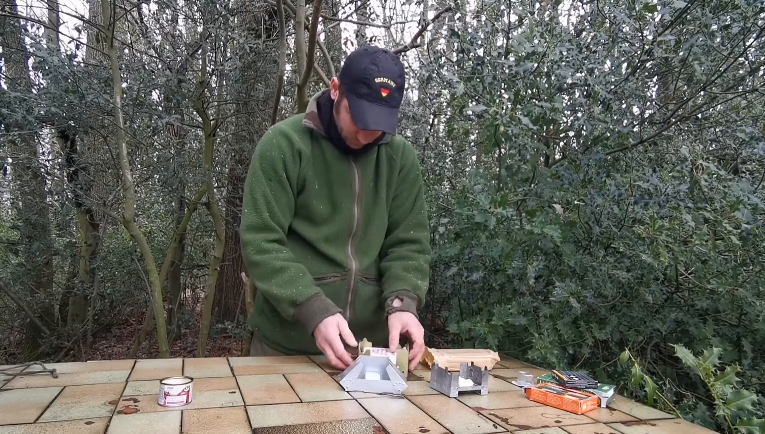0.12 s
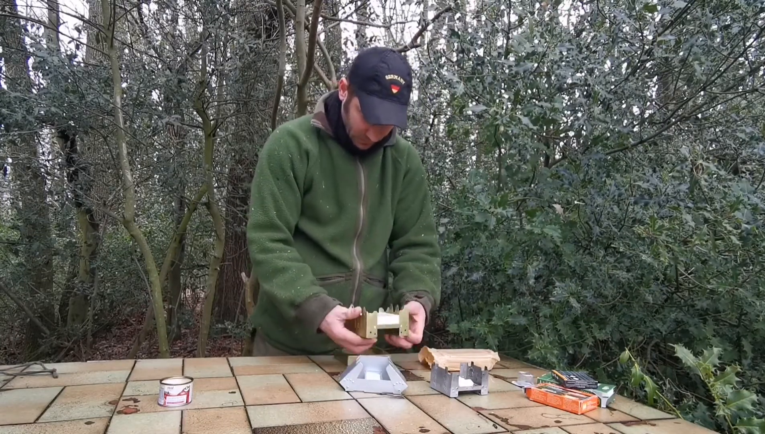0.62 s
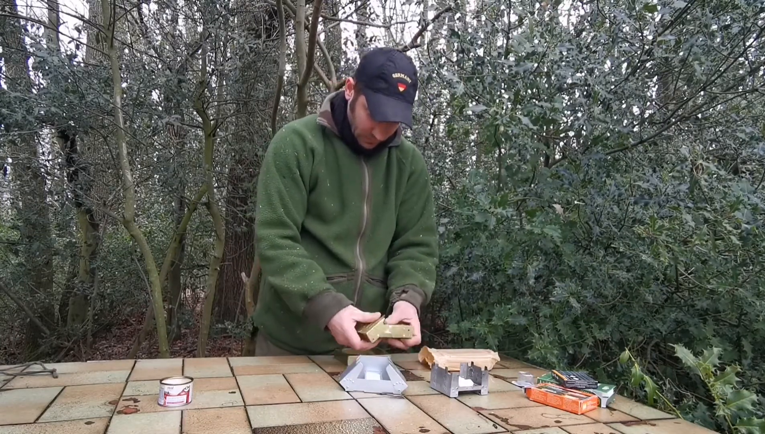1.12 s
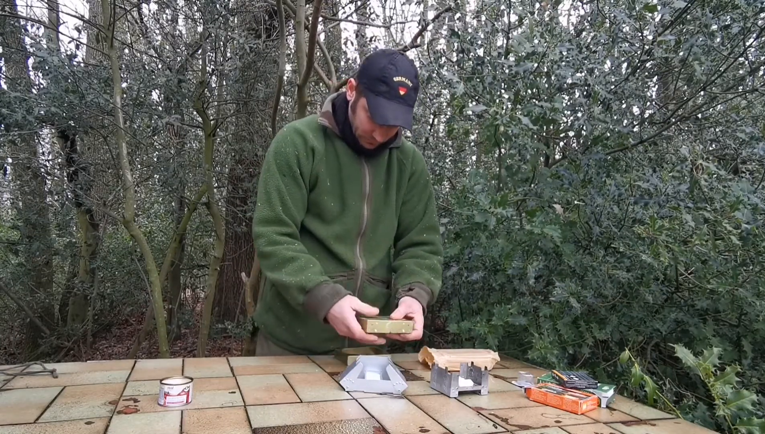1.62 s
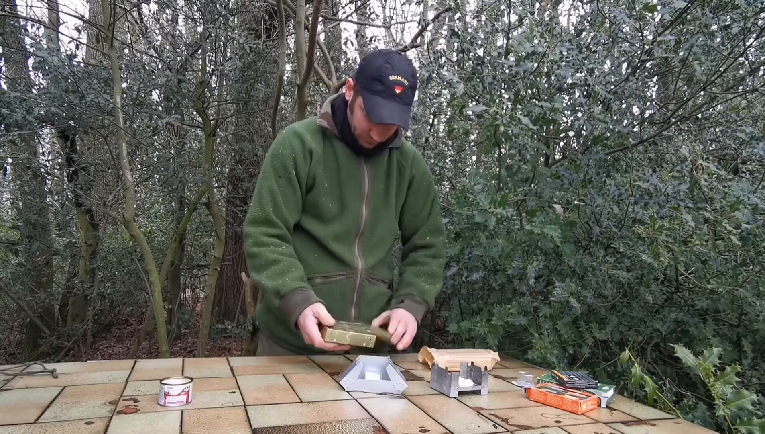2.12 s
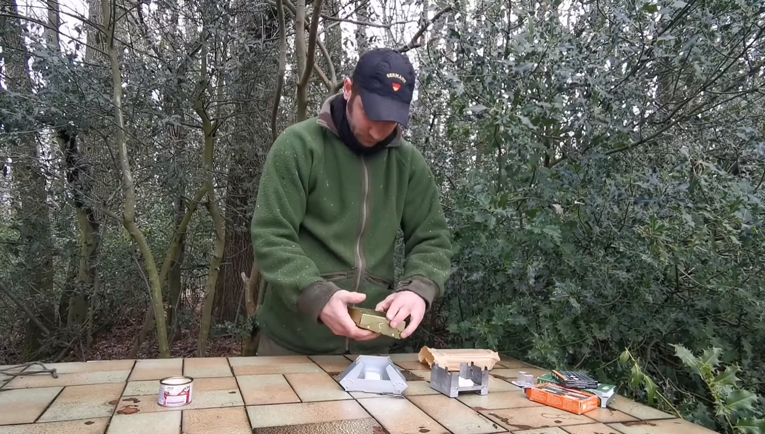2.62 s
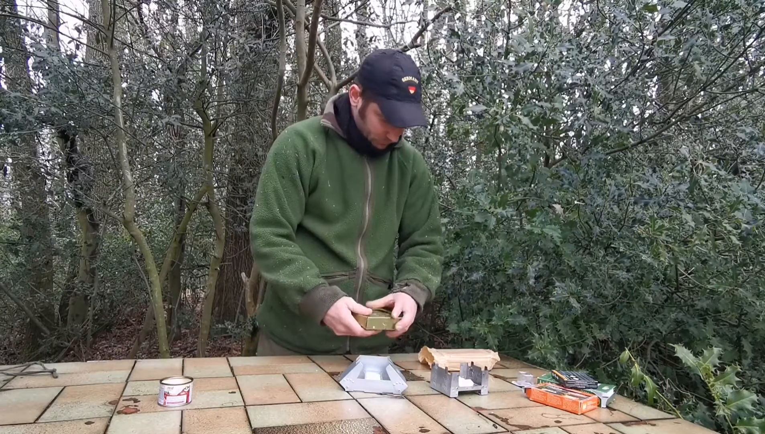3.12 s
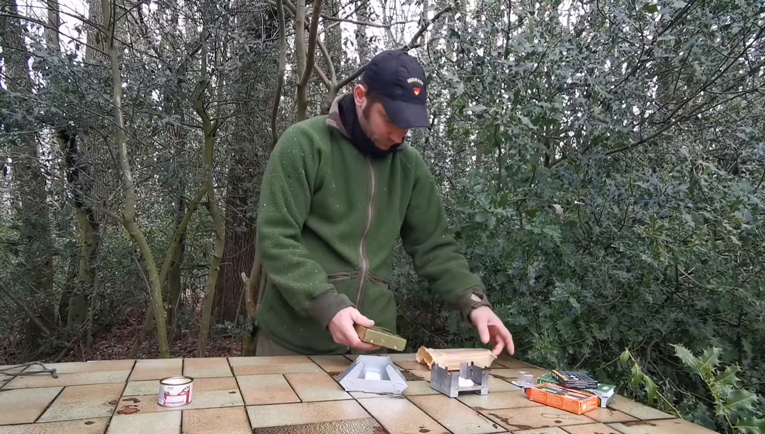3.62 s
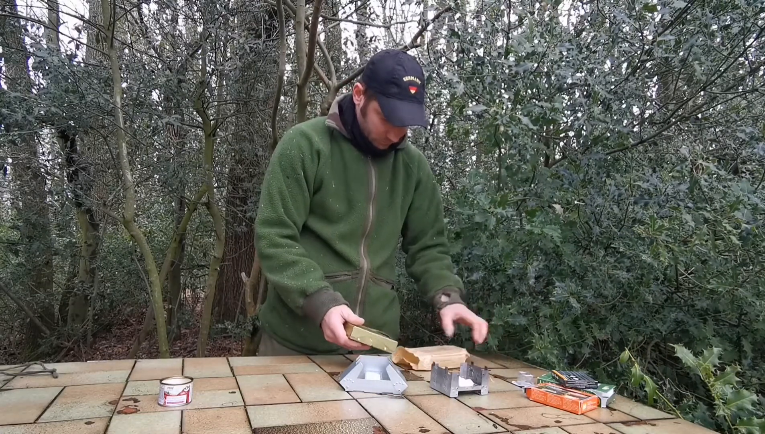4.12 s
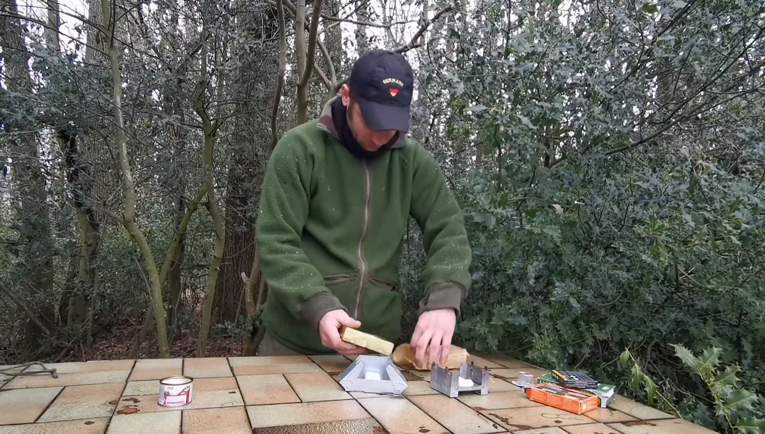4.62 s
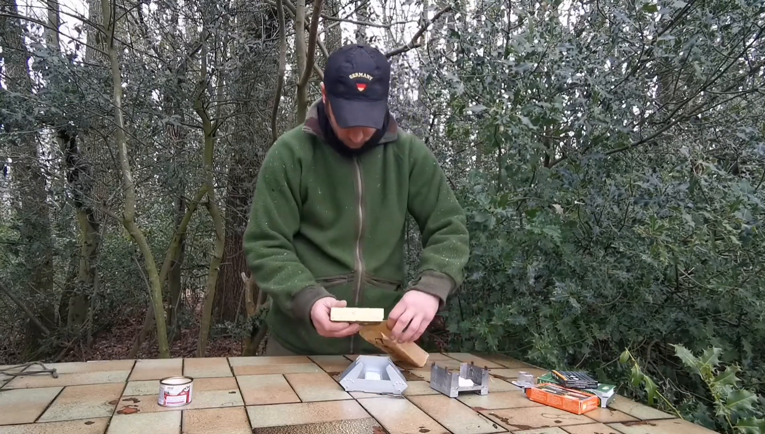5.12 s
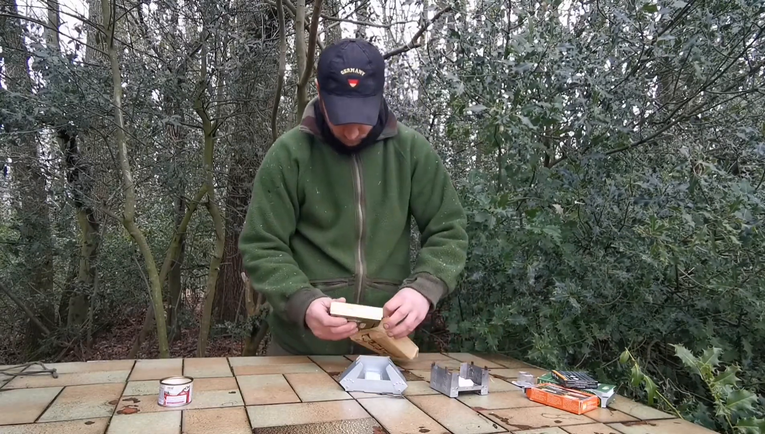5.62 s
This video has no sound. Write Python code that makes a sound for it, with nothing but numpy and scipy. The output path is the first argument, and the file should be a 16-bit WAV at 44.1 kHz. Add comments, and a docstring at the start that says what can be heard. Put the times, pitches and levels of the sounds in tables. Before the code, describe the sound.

Sharp bright metallic clacks and scrapes from handled folding metal, dense then sparse, while woodland birds whistle and chip over soft low rumble.

```python
"""Sharp clicks, knocks and rubbing: hands fold and open small sheet-metal stoves over a tiled table in a wood.
Blows start decaying modes of the sheet; slides are noise broken into grains. Birds whistle, slur, chip and rasp
as gliding sines and partial stacks; far songs and the rasper's fading last calls are narrow moving noise. One
far engine drone near 78 Hz lies over a wandering low rumble at 46-67 Hz, both wavering sines. Air and far
traffic are shaped noise."""
import sys
import numpy as np
from scipy import signal
from scipy.fft import rfft, irfft
from scipy.io import wavfile

SR = 44100
rng = np.random.default_rng(int(sys.argv[2]) if len(sys.argv) > 2 else 0)


def persist_wave(psi):
    """Save psi, clipped to +-1, as 16-bit WAV."""
    counts = np.round(np.clip(psi, -1, 1) * 32767).astype(np.int16)
    wavfile.write(sys.argv[1], SR, np.atleast_2d(counts).T)


def voltage_ratio(level):
    """Linear amplitude factor for a level in decibels (scalar or array-like)."""
    return 10 ** (np.asarray(level, float) / 20)


N = 254016


def in_time(rows):
    """Table columns interpolated at every sample."""
    s, *columns = np.transpose(rows)
    return [np.interp(np.arange(N) / SR, s, c) for c in columns]


def at_hz(points, hz):
    """A spectrum read on a log-frequency axis."""
    points_hz, values = np.transpose(points)
    return np.interp(np.log(hz), np.log(points_hz), values)


def rms_one(x):
    """Scaled to unit rms."""
    return x / np.sqrt(np.mean(x ** 2) + 1e-20)


def drift(rate_hz):
    """Slow chance of spread 1: noise through two equal poles, drawn every 40 samples."""
    pole = np.exp(-2 * np.pi * rate_hz * 40 / SR)
    noise = rng.standard_normal(N // 40 + 2002)
    slow = signal.lfilter([1], [1, -2 * pole, pole * pole], noise)[2000:]   # settled part
    return np.interp(np.arange(N) / 40, np.arange(len(slow)), rms_one(slow))


# left-right likeness: (frequency [Hz], likeness [-1..1])
LIKENESS = [(60, 0.88), (180, 0.71), (550, 0.55), (1650, 0.22), (5000, -0.21), (15000, -0.095)]


def coloured(white, spectrum):
    """Mid and side noise shaped by a spectrum and mixed to left and right by likeness; rms 1."""
    hz = np.maximum(np.fft.rfftfreq(N, 1 / SR), 10)
    alike = np.clip(at_hz(LIKENESS, hz), -1, 1)
    mid, side = rfft(white) * voltage_ratio(at_hz(spectrum, hz))
    mid, side = np.sqrt(1 + alike) * mid, np.sqrt(1 - alike) * side
    return rms_one(irfft(mid + side * [[1], [-1]], N))


def trees(x, t60_s):
    """Trunks scatter the sound back as a short dull tail, different on each side."""
    t = np.arange(SR // 2) / SR
    tail = rng.standard_normal((2, len(t))) * voltage_ratio(-60 * t / t60_s) * (t > .006)
    tail = signal.lfilter([.5], [1, -.5], tail)
    tail = tail / np.sqrt(np.sum(tail ** 2) / 2)
    return signal.fftconvolve(x, tail, axes=1)[:, :N]


def sung(notes, wobble_db):
    """Near sines that follow pitch and rms level, silent between notes."""
    out, wobble = np.zeros(N), voltage_ratio(wobble_db * drift(135))
    for rows in notes:
        s, hz, level_db = np.transpose(rows)
        at = np.arange(round(s[0] * SR), min(round(s[-1] * SR), N))
        level = np.sqrt(2) * voltage_ratio(np.interp(at / SR, s, level_db)) * signal.windows.tukey(len(at), .25)
        phase = 2 * np.pi * np.cumsum(np.interp(at / SR, s, hz)) / SR
        out[at] += level * np.sin(phase)
    return out * wobble


def glides(notes, wobble_db, edge_db=6):
    """Straight sweeps from a first to a last pitch, loudest in the middle."""
    curves = []
    for s, long_s, first_hz, last_hz, db in notes:
        curves.append([(s, first_hz, db - edge_db),
                       (s + .5 * long_s, .5 * (first_hz + last_hz), db),
                       (s + long_s, last_hz, db - edge_db)])
    return sung(curves, wobble_db)


# spectrum shape of air and far traffic: (frequency [Hz], relative density [dB per Hz])
WOOD = [(12, -27), (20, 3.5), (70, -2.5), (123, -8.5), (168, -10), (347, -20.5), (660, -21), (1660, -27),
        (2750, -19.5), (3840, -28), (6720, -27), (8180, -37), (13200, -35.5), (14700, -37.5),
        (16000, -42.5)]


def air(level_db=-58, patchy_db=2.5):
    """Leaves, far birds and traffic as shaped noise: each octave swells and sinks largely on its own."""
    noise = rfft(coloured(rng.standard_normal((2, N)), WOOD))
    octave = np.log2(np.maximum(np.fft.rfftfreq(N, 1 / SR), 125) / 125)
    together, out = drift(0.38), 0
    for k in range(9):
        band = irfft(noise * np.maximum(1 - np.abs(octave - k), 0), N)
        out = out + band * voltage_ratio(patchy_db * (0.2 * together + 1.08 * drift(4.7)))
    return voltage_ratio(level_db) * out


def wavering_sine(curve, waver_db):
    """One low sine along a pitch and level curve, both drifting by chance."""
    hz, level_db = in_time(curve)
    phase = 2 * np.pi * np.cumsum(hz + 3.39 * drift(5.44)) / SR
    return np.sqrt(2) * voltage_ratio(level_db + waver_db * drift(6.7)) * np.sin(phase)


# wandering low rumble before wavering: (time [s], pitch [Hz], level [dB])
LOW_RUMBLE = [(0, 46.53, -56), (1.64, 57.45, -59), (1.94, 59.7, -82), (3.98, 62.94, -56.5),
              (4.14, 67.07, -54.5), (4.94, 66.86, -69), (5.04, 63.6, -53.5), (5.76, 65.66, -55.5)]


def low_rumble():
    """A wandering low rumble at 46-67 Hz: one wavering sine."""
    return wavering_sine(LOW_RUMBLE, waver_db=1.0)


# far engine drone before wavering: (time [s], pitch [Hz], level [dB])
ENGINE_DRONE = [(0.0, 77.63, -47.5), (0.93, 81.1, -49), (1.27, 81.4, -57), (1.43, 74.4, -71),
                (1.94, 75.75, -70.5), (2.21, 80.0, -64), (2.73, 79.9, -64), (2.82, 76, -71),
                (3.13, 78.4, -55), (3.42, 80.2, -74), (3.88, 76.3, -56.5), (4.11, 78.6, -48),
                (4.62, 80.1, -54.5), (5.63, 80.2, -43.5), (5.76, 77.3, -40.5)]


def engine_drone():
    """One far engine order near 78 Hz, wavering on its way through the air."""
    return wavering_sine(ENGINE_DRONE, waver_db=1.5)


# far songs blurred by the trees, and from 4.8 s the rasping bird's fading last calls as narrow noise: (start
# [s], length [s], first pitch [Hz], last pitch [Hz], level [dB])
BLURRED_SONGS = [(1.75, 0.28, 6690, 6300, -63), (2.087, 0.47, 4880, 4960, -64.5),
                 (3.381, 0.11, 4420, 4300, -58.5), (3.479, .24, 4150, 4140, -64.5),
                 (3.778, 0.208, 3920, 4000, -61.5), (3.974, 0.051, 3880, 4070, -56),
                 (4.817, .05, 4800, 5430, -58.5), (4.897, 0.092, 5200, 5930, -61.5),
                 (5.039, 0.079, 5200, 5900, -66.5), (5.144, 0.095, 3380, 3330, -74)]


def blurred_songs(width_hz=450):
    """Narrow noise carried on each moving centre, unrelated left and right."""
    lowpass = signal.butter(2, width_hz, fs=SR, output="sos")
    in_phase, quadrature = rms_one(signal.sosfilt(lowpass, rng.standard_normal((2, 2, N))))
    out = np.zeros((2, N))
    for s, long_s, first_hz, last_hz, level_db in BLURRED_SONGS:
        at = np.arange(round(s * SR), round((s + long_s) * SR))
        turn = 2 * np.pi * np.cumsum(np.linspace(first_hz, last_hz, len(at))) / SR
        carried = in_phase[:, at] * np.cos(turn) + quadrature[:, at] * np.sin(turn)
        out[:, at] += voltage_ratio(level_db) * signal.windows.tukey(len(at), .3) * carried
    return out


# thin high notes far off: (start [s], length [s], first pitch [Hz], mid-note level [dB])
THIN_NOTES = [(1.34, 0.1, 7520, -64), (1.559, 0.17, 7530, -69), (5.54, 0.19, 7640, -72)]


def thin_notes(sag_hz=162):
    """Thin high sines that sag a little and waver strongly in level."""
    return glides([(s, long_s, hz, hz - sag_hz, db) for s, long_s, hz, db in THIN_NOTES], wobble_db=6.5)


# slurred notes: (start [s], length [s], first pitch [Hz], last pitch [Hz], mid-note level [dB])
SLURS = [(2.25, 0.043, 2800, 2220, -60), (3.885, .022, 3340, 2630, -58), (4.212, .03, 3422, 2600, -59),
         (4.345, .028, 3400, 2530, -64), (4.857, 0.016, 2074, 3083, -58), (4.868, .016, 2000, 1734, -60),
         (4.902, 0.0144, 1980, 3280, -52.5), (4.918, 0.035, 3530, 3700, -60),
         (5.072, .042, 2220, 1780, -62), (5.115, 0.02, 2000, 3450, -51)]


def slurs():
    """Brief sines sweeping straight up or down."""
    return glides(SLURS, wobble_db=2.5)


# falling chips, all alike: (start [s], mid-note level [dB])
CHIPS = [(0.054, -63.5), (.18, -70), (.77, -68), (0.811, -64.5), (1.362, -69), (1.797, -66.5),
         (2.003, -59.5), (2.115, -61.5), (2.465, -66), (3.015, -58), (3.073, -61.5), (3.134, -63.5),
         (3.189, -56), (3.253, -60), (3.318, -62), (3.397, -63), (4.088, -58)]
CHIP_S, CHIP_TOP_HZ, CHIP_END_HZ = 0.0248, 3700, 2900
TICKS_FROM_S, TICK_EVERY_S, TICK_S, TICK_DB = 4.955, .0647, .016, -61
TICK_TOP_HZ, TICK_END_HZ = 3600, 2480


def chips():
    """Short downward sweeps: scattered chips and one even run of eight steeper ticks."""
    scattered = [(s, CHIP_S, CHIP_TOP_HZ, CHIP_END_HZ, db) for s, db in CHIPS]
    ticks = [(TICKS_FROM_S + k * TICK_EVERY_S, TICK_S, TICK_TOP_HZ, TICK_END_HZ, TICK_DB) for k in range(8)]
    return glides(scattered + ticks, wobble_db=0.0)


# rasping calls: (start [s], final pitch [Hz], level before swell and flutter [dB])
RASPS = [(4.065, 502.7, -57), (4.19, 513.7, -55), (4.309, 530, -57.5), (4.435, 538.3, -56),
         (4.56, 512, -57), (4.685, 478, -58.5)]
# throat resonances: (centre [Hz], width [Hz], gain [dB])
RASP_THROAT = [(4250, 750, -1), (5100, 700, 0), (6000, 700, -13), (6750, 600, -8)]
RASP_S, RASP_RISE = .08, .065   # length; share by which the pitch climbs


def rasps():
    """A low pitch whose upper partials pass the throat resonances: a stack of close lines rising, then level."""
    out, order = np.zeros(N), np.arange(7, 15)[:, None]
    flutter = voltage_ratio(2 * drift(120))
    hoarse = signal.lfilter([.02], [1, -.98], rng.standard_normal((len(order), N)))
    for s, end_hz, level_db in RASPS:
        part = np.linspace(0, 1, round(RASP_S * SR))
        swing = .04 * np.exp(-12 * part)   # quick upswing at the start
        hz = end_hz * (1 - RASP_RISE * (1 - part) ** 2 - swing)
        throat = sum(voltage_ratio(db) / (1 + (2 * (order * hz - centre_hz) / width_hz) ** 6)
                     for centre_hz, width_hz, db in RASP_THROAT)
        at = round(s * SR)
        throat = throat * (1 + 9 * hoarse[:, at:at + len(part)])   # each partial roughened on its own
        phase = order * 2 * np.pi * np.cumsum(hz) / SR + order ** 2
        voiced = rms_one(np.sum(throat * np.sin(phase), axis=0))
        out[at:at + len(part)] += voltage_ratio(level_db) * np.sqrt(2) * voiced * np.sin(np.pi * part) ** 0.58
    return out * flutter


# clear whistles: (start [s], length [s], top pitch before scoop and bend [Hz], last pitch [Hz], peak level [dB])
WHISTLES = [(3.4, .073, 2990, 2870, -45), (3.505, .085, 3190, 2380, -49), (3.968, .088, 3150, 2800, -45),
            (4.09, .082, 3160, 2380, -46), (.915, .05, 2800, 2550, -61), (.96, .06, 3000, 2750, -64),
            (1.555, .07, 2900, 2750, -65), (1.71, .07, 2950, 2800, -63), (2.36, .11, 2930, 2800, -60),
            (2.84, .09, 2970, 2760, -65)]
SCOOP_HZ, SCOOP_SHARE, BEND_POWER = 330, .25, 3.0
WHISTLE_SWELL_DB, WHISTLE_DROP_DB, LOUDEST_SHARE = 18, 9, .65


def whistles():
    """Sines scoop up and bend down at the end; the level swells to its loudest moment and drops."""
    part = np.linspace(0, 1, 12)
    rising = part < LOUDEST_SHARE
    depth_db = np.where(rising, WHISTLE_SWELL_DB, WHISTLE_DROP_DB)
    span = np.where(rising, LOUDEST_SHARE, 1 - LOUDEST_SHARE)
    swell_db = -depth_db * ((part - LOUDEST_SHARE) / span) ** 2
    scoop_hz = SCOOP_HZ * np.exp(-part / SCOOP_SHARE)
    notes = []
    for s, long_s, top_hz, last_hz, db in WHISTLES:
        hz = top_hz - scoop_hz - (top_hz - last_hz) * part ** BEND_POWER
        notes.append(np.c_[s + long_s * part, hz, db + swell_db])
    return sung(notes, wobble_db=1.0)


# sliding on the sheet: (loudest moment [s], swell [ms], pressure [dB], finger over edge [dB])
SLIDES = [(0, 5, -62.5, 23), (.125, 19, -61, -7), (0.342, 3.7, -53.5, 2), (.44, 72, -57.5, 4),
          (.495, 12, -55.5, -1), (0.762, 37, -59, 3), (.885, 21, -56.5, 3), (1.072, 15.7, -39, -1.5),
          (1.149, 40, -48.5, 5), (1.2, 6.3, -71, -20), (1.238, 11, -43, -8), (1.39, 42, -70, -14),
          (1.463, 18, -62.5, 25), (1.645, 11, -58, -8), (1.879, 21, -51, -2), (1.92, 13, -60, 17),
          (2.07, 29, -58.5, -0.5), (2.218, 6.5, -48.5, -21), (2.332, 3.3, -44.5, -36),
          (2.629, 16, -40.5, -12), (2.68, 9.1, -36, -15), (2.783, 18, -48, 2.5), (2.967, 5.2, -35.5, -7.5),
          (2.995, 5, -54, 0), (3.25, 6.6, -56, -21), (3.729, 4.7, -52, -7.5), (3.93, 97, -56.5, -4.5),
          (4.5, 66, -72.5, -33), (4.63, 18, -85, -7), (4.762, 150, -57, 0), (5.28, 31, -56.5, 7),
          (5.491, 70, -56, -1.5), (5.74, 45, -54, 1.5)]
# spectrum shapes of edges and of fingers: (frequency [Hz], relative density [dB per Hz])
BRIGHT_RUB = [(2000, -33), (3500, 4), (6000, 5), (8000, 0), (11000, 0), (15500, -23)]
DULL_RUB = [(250, -14), (600, -0.5), (1200, 0), (2000, 4.5), (3500, -4), (6000, -14.5)]
FADE_MS, FADE_PER_SWELL = 15.5, 0.55   # a slide dies away slower the slower it swelled


def rubbing():
    """Sliding contact: noise broken into uneven grains, bright on edges and dull under fingers."""
    ms, bright, dull = np.arange(0, N, 20) / SR * 1000, 0, 0
    for s, swell_ms, pressure_db, finger_db in SLIDES:
        since_ms = ms - s * 1000
        fade_ms = FADE_MS + FADE_PER_SWELL * swell_ms
        rise_fall = np.where(since_ms < 0, since_ms / max(swell_ms, 1), -since_ms / fade_ms)
        pressure = voltage_ratio(pressure_db) * np.exp(rise_fall)
        bright = bright + voltage_ratio(-.5 * finger_db) * pressure
        dull = dull + voltage_ratio(.5 * finger_db) * pressure
    bright, dull = (np.interp(np.arange(N) / SR * 1000, ms, level) for level in (bright, dull))
    grains = rng.standard_normal((2, 2, N)) * voltage_ratio(2.04 * drift(187) + 2.0 * drift(48))
    return bright * coloured(grains[0], BRIGHT_RUB) + dull * coloured(grains[1], DULL_RUB)


# metal meets metal or tile:
# (time [s], peak of the whole blow [dB], favoured ring [Hz], contact [ms], strength of far lows and highs [dB])
BLOWS = [(0.1139, -45.5, 2870, 10.6, 0.5), (0.244, -44, 2890, 3.9, -21), (.3267, -41.5, 1310, 9, -4),
         (0.3407, -35, 1220, 3.3, -8), (0.3635, -35, 2800, 5.4, -13), (0.4035, -27.5, 1450, 5.1, -20),
         (0.425, -37, 2800, 1.84, -17), (.46, -26, 2970, 2.96, -33.5), (0.487, -42.5, 5380, 8.7, 19),
         (0.681, -54, 6000, 4.9, 12), (.745, -46, 1940, 3.65, -13), (.8758, -40, 2050, 8.4, -2),
         (0.936, -45.5, 7000, 2, -17), (1.0438, -44, 6760, 8.6, -7), (1.054, -45, 2630, 9.7, -23),
         (1.072, -17.5, 5800, 1.6, -6.5), (1.078, -20.5, 6200, 2.4, -3), (1.1348, -34.5, 5210, 7.6, 5),
         (1.1568, -26, 5650, 1.7, 4), (1.19, -41, 1620, 49, -17), (1.24, -19.5, 1580, 1.37, 2),
         (1.2408, -22.5, 1080, 6.6, -1.5), (1.2532, -24, 2000, 4.5, -4), (1.3364, -44, 7100, 2.7, -6),
         (1.3867, -44.5, 1930, 6, -5), (1.398, -48, 7320, 2.3, -4), (1.4455, -40, 6800, 11.5, -5),
         (1.4606, -28, 2230, 3.1, 10), (1.4651, -19.5, 1950, 4.78, -9), (1.4831, -45, 2130, 8.8, -26),
         (1.6421, -31.5, 6300, 2.9, -3.5), (1.702, -44, 6700, 3.1, -11), (1.8563, -35.5, 6950, 2.9, -9),
         (1.8754, -37, 1600, 2.8, -18), (1.8847, -37, 1640, 3, -6), (1.904, -29, 6500, 1.38, -10),
         (1.9383, -37.5, 1920, 3, -8), (2.0664, -45.5, 5300, 3.3, -4), (2.2021, -33, 2560, 14, -16),
         (2.2156, -28.5, 3440, 10.2, -16), (2.2222, -33, 2740, 7.5, -29), (2.324, -23, 10900, 2.9, -1),
         (2.3283, -21, 6500, 11.2, -8.5), (2.416, -43, 6100, 7.1, 8), (2.5798, -12, 6880, 8.1, -3.5),
         (2.6006, -14, 5810, 6.8, -3.5), (2.6105, -16, 3700, 7.1, -3), (2.6258, -17, 6930, 9.4, -3),
         (2.634, -25, 3480, 7.3, -22), (2.657, -29, 6850, 13, -12.5), (2.682, -14, 4700, 3.68, -9),
         (2.684, -13.5, 11300, 8.9, -13), (2.7868, -30, 4770, 10.1, -7.5), (2.929, -48, 6100, 8.5, -8),
         (2.9672, -16.5, 6560, 4.25, 1.5), (2.99, -19.5, 6000, 2.9, 0), (3.134, -46, 3555, 2.7, -6),
         (3.243, -31, 5030, 3.22, 5.5), (3.7248, -39.5, 10200, 9, -10.5), (4.623, -43, 4480, 8.4, -8),
         (4.6743, -52, 5100, 13, 8), (5.2343, -45, 2665, 3.4, -5.5), (5.2654, -41.5, 2630, 7.04, -6),
         (5.4784, -36.5, 417, 4.1, 8), (5.5036, -42.5, 1554, 7.2, 8), (5.7077, -48, 710, 10.5, -2),
         (5.7326, -33, 1180, 1.5, 11)]
# modes of the folded sheet: (frequency [Hz], relative level [dB], free t60 [s])
SHEET = [(1502, 4, 0.058), (2230, -3, 0.68), (3480, -8, 0.3), (3880, -29, 0.031), (4706, -4, 0.3),
         (5233, 4.5, 0.46), (6000, 1, 0.31), (6600, -13.5, 0.23), (6232, 2, 0.15), (6930, 9.5, 0.3),
         (8260, -4, 0.1), (8740, -1, 0.12), (8700, -20, 0.19), (9020, -3, 0.029), (9030, -30, 0.2),
         (10860, 5.5, 0.13), (14470, -2.5, 0.19), (14350, 6.5, 0.1)]
CROWD_DB, CROWD_T60_AT_3KHZ_S = -10.5, 0.2   # many weak modes besides
GRIPPED_T60_S = .22   # longest t60 of a sheet mode under the fingers
EVEN_RING_HZ, THUD_DB_PER_OCTAVE = 6500, 3.5   # a ring below this adds thud and takes sizzle
FREE_RING = 0.067   # share that rings on after the contact


def blow_colour_db(far_db, ring_hz, hz):
    """Mode levels of one blow: thud below, sizzle above and a bump at the favoured ring."""
    tilt_db = THUD_DB_PER_OCTAVE * np.log2(EVEN_RING_HZ / ring_hz)
    thud_db, sizzle_db = far_db + tilt_db, far_db - tilt_db
    colour = [(300, thud_db - 15.5), (800, thud_db - 4.0), (1800, -1.7), (3200, 0.015),
              (5000, 0.65 * sizzle_db + 2.5), (8500, sizzle_db - .6),
              (13000, sizzle_db + 6.0), (15500, sizzle_db - 3.5)]
    return at_hz(colour, hz) + 9.0 * np.exp(-(np.log(hz / ring_hz) / 0.15) ** 2)


def blows():
    """Each blow starts all modes of the sheet with new strengths; the gripping fingers damp them."""
    t = np.arange(SR // 5) / SR
    sheet_hz, sheet_db, sheet_t60_s = np.transpose(SHEET)
    crowd_hz = 300 + 15700 * np.sort(rng.random(500)) ** 1.4
    hz = np.r_[sheet_hz, crowd_hz]
    level_db = np.r_[sheet_db, CROWD_DB + 0 * crowd_hz]
    crowd_t60_s = CROWD_T60_AT_3KHZ_S * (crowd_hz / 3000) ** -.2
    t60_s = np.r_[np.minimum(sheet_t60_s, GRIPPED_T60_S), crowd_t60_s]
    rings = np.exp(np.outer(2j * np.pi * hz - np.log(1000) / t60_s, t))
    apart = np.arccos(np.clip(at_hz(LIKENESS, hz) + 0.28, -1, 1))   # phase between the microphones
    spread_db = 3.8 * np.sqrt(np.minimum(hz / 3000, 1))
    chance = rng.standard_normal((len(BLOWS), 3, len(hz)))
    bounce = rng.random((len(BLOWS), 2, 3))
    strengths = []
    for (_, _, ring_hz, _, far_db), (size, phase, turn) in zip(BLOWS, chance):
        mode_db = level_db + blow_colour_db(far_db, ring_hz, hz) + spread_db * size
        left = voltage_ratio(mode_db) * np.exp(10j * phase)
        strengths.append([left, left * np.exp(1j * apart * np.sign(turn))])
    sounds = (np.reshape(strengths, (-1, len(hz))) @ rings).real.reshape(len(BLOWS), 2, -1)
    out = np.zeros((2, N + len(t)))
    for (s, peak_db, _, contact_ms, _), sound, (lag, share) in zip(BLOWS, sounds, bounce):
        # a long contact swells and dies slowly, a short one snaps
        contact_s = max(contact_ms, .5) / 1000
        onset = 1 - np.exp(-t / (0.092 * contact_s))
        sound = sound * (np.exp(-t / contact_s) + FREE_RING) * onset
        lags = (lag * .4 * contact_s * SR).astype(int) + 1
        for late, weight in zip(lags, share):   # edges chatter as they meet
            sound[:, late:] += 0.66 * weight * sound[:, :-late].copy()
        at = round(s * SR)
        out[:, at:at + len(t)] += voltage_ratio(peak_db) * sound / np.abs(sound.mean(axis=0)).max()
    return out[:, :N]


TREE_ECHO_DB, TREE_T60_S = -18.5, 0.29
BIRD_ECHO_DB, BIRD_T60_S = -10, .4   # far calls carry a longer tail
WHISTLE_ECHO_DB = -18   # the whistler sits nearer


def scene():
    """Table in front, birds around, engine drone, rumble and air below."""
    far = air() + low_rumble() + engine_drone() + blurred_songs()
    birds = (thin_notes() + slurs() + chips() + rasps()) * voltage_ratio([[.6], [-.6]])
    whistle = whistles()
    # this bird sits to one side: right louder and 5 samples later
    aside = np.array([whistle * voltage_ratio(-2.5), np.roll(whistle, 5) * voltage_ratio(1.5)])
    bird_echo = trees(voltage_ratio(BIRD_ECHO_DB) * birds + voltage_ratio(WHISTLE_ECHO_DB) * aside, BIRD_T60_S)
    table = rubbing() + blows()
    table_echo = voltage_ratio(TREE_ECHO_DB) * trees(table, TREE_T60_S)
    return far + birds + aside + bird_echo + table + table_echo


def band_limit(x):
    """A steep low-pass at the top of the band."""
    return signal.sosfilt(signal.butter(12, 16650, fs=SR, output="sos"), x)


# microphone pair: (frequency [Hz], left minus right [dB])
LEANING = [(60, 1.5), (180, 0), (550, -3.5), (1650, -5), (4970, -2.5), (15000, -11)]


def record(dry):
    """The pair hears the treble louder on the right; a steep low-pass cuts above 16 kHz."""
    hz = np.maximum(np.fft.rfftfreq(N, 1 / SR), 10)
    lean = voltage_ratio(np.outer([.5, -.5], at_hz(LEANING, hz)))
    top = 1 / np.sqrt(1 + (hz / 16000) ** 80)
    mix = irfft(rfft(dry) * top * lean, N)
    return band_limit(mix)


dry = scene()
out = record(dry)
persist_wave(out)
```